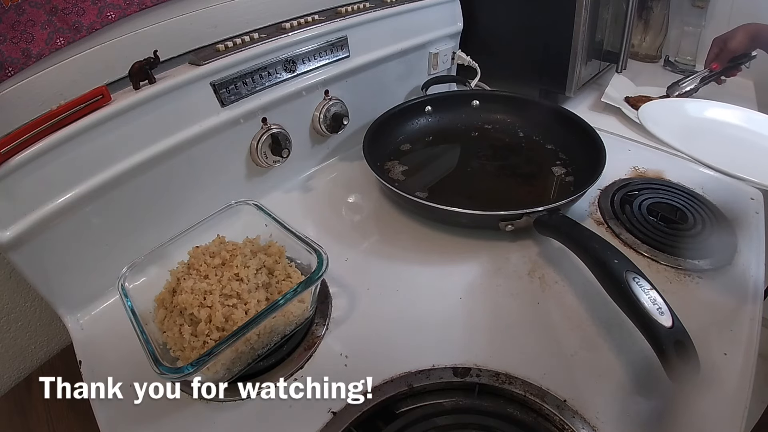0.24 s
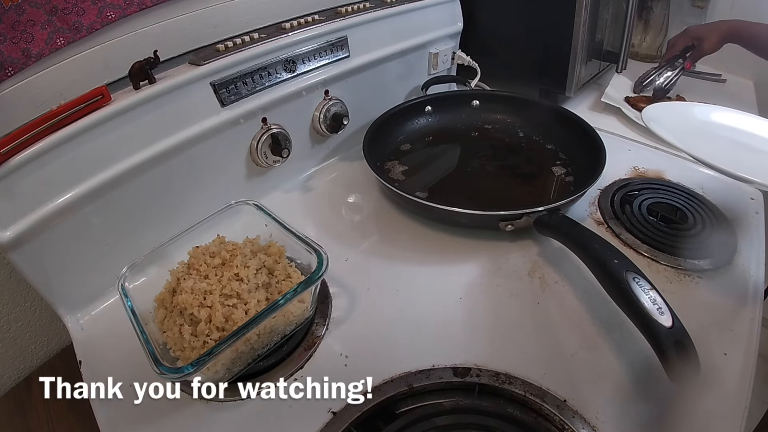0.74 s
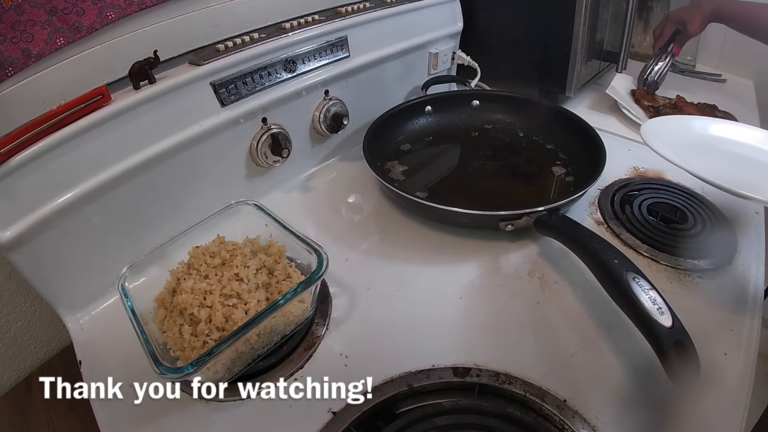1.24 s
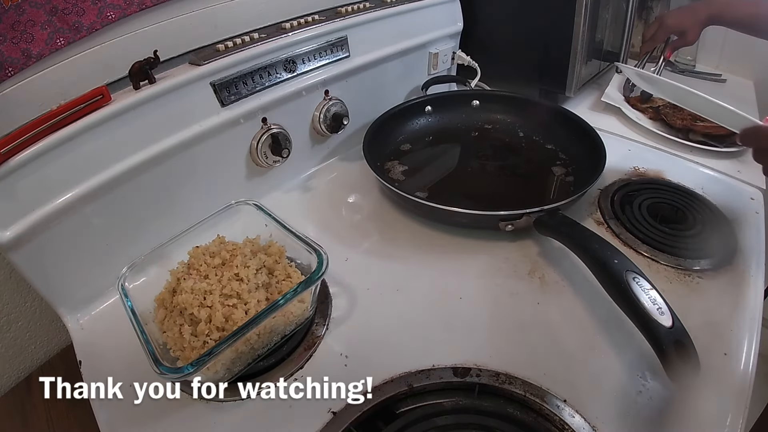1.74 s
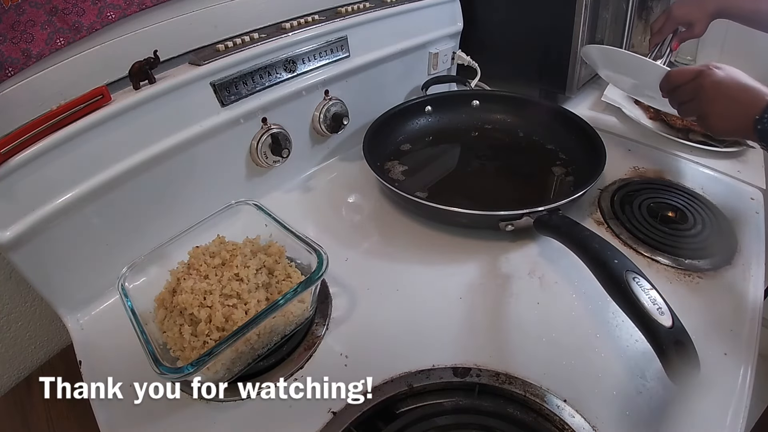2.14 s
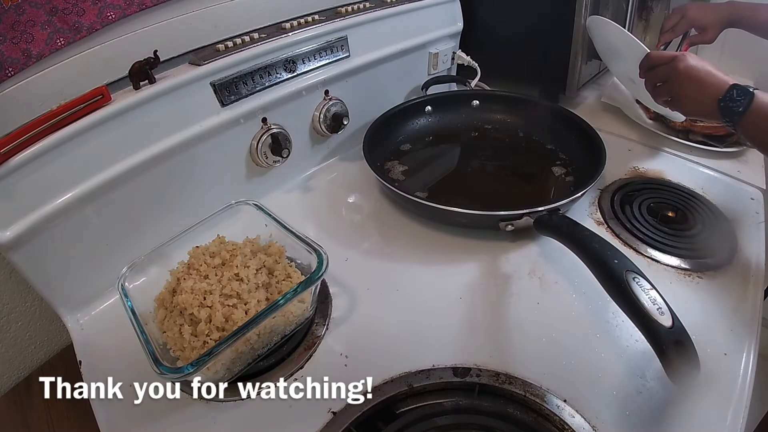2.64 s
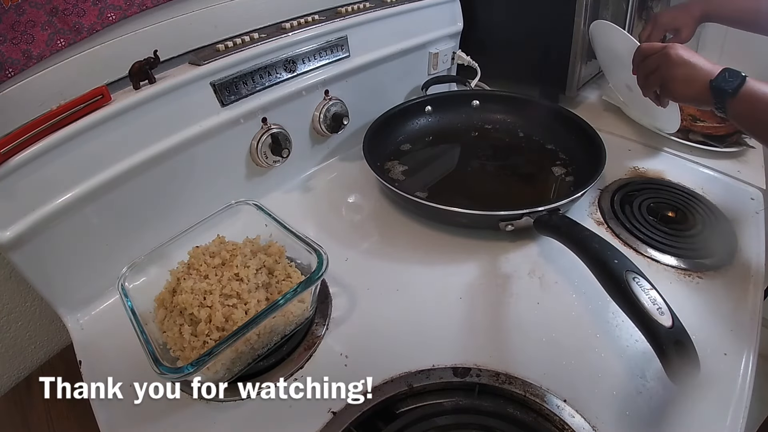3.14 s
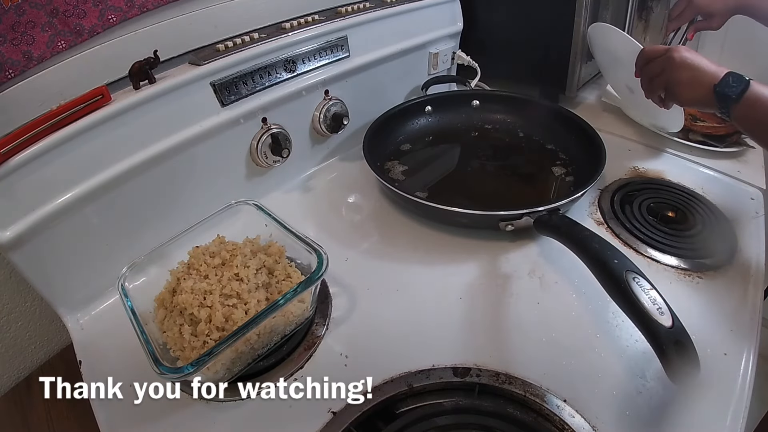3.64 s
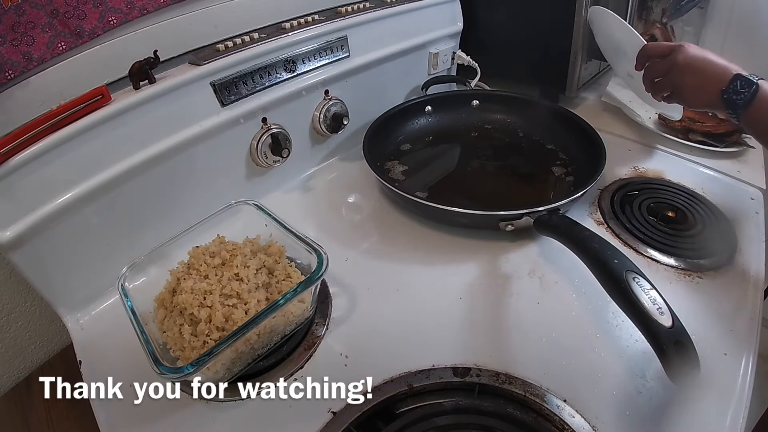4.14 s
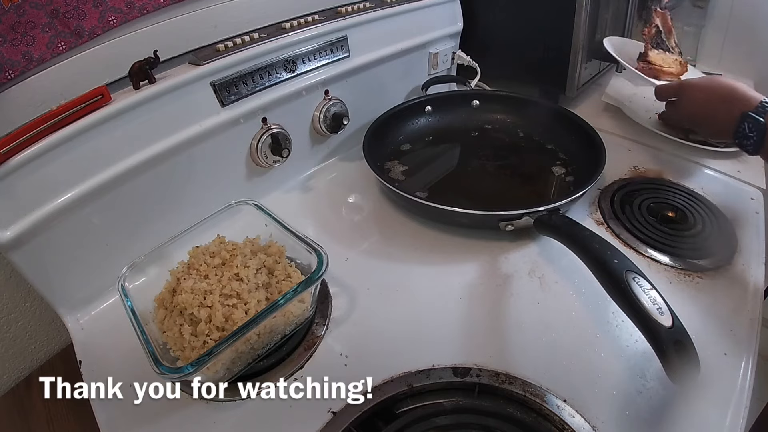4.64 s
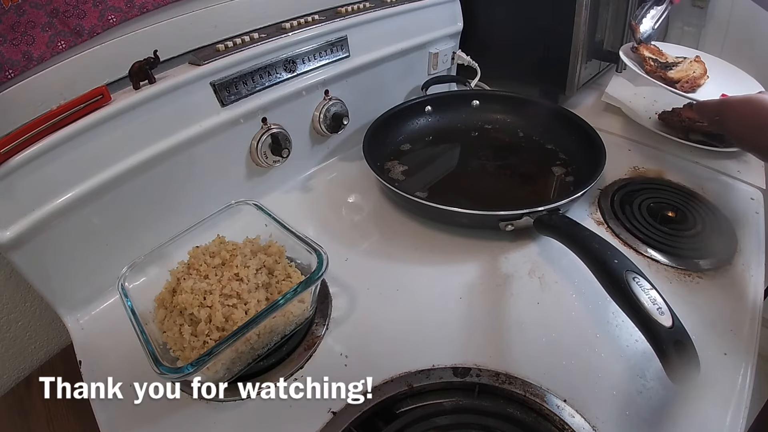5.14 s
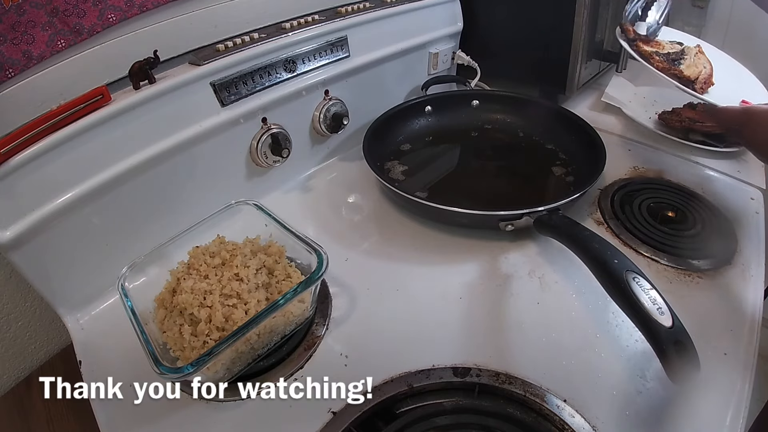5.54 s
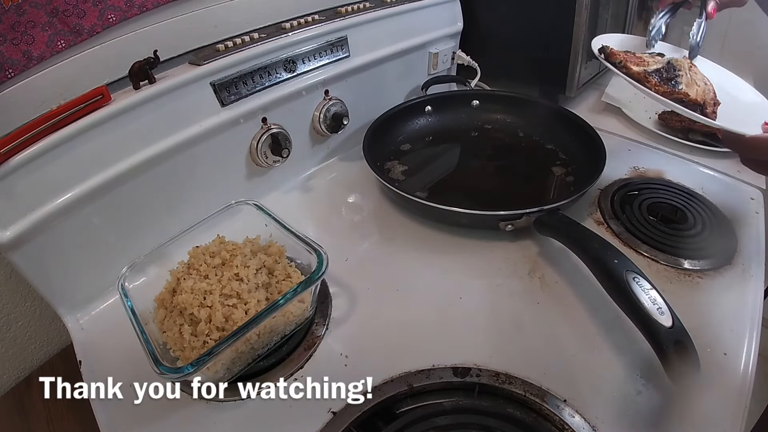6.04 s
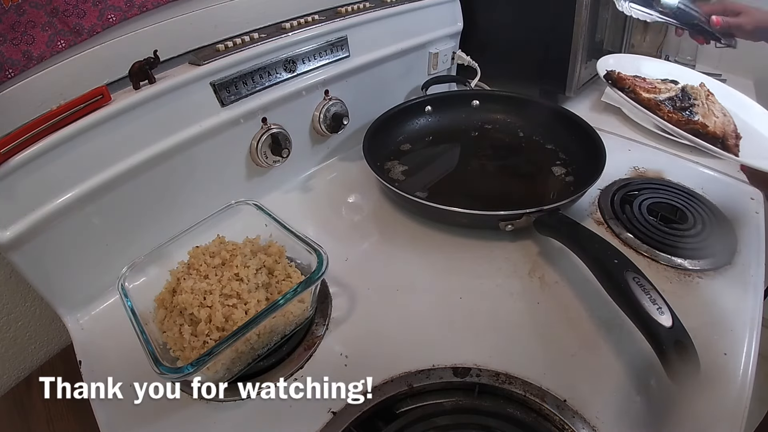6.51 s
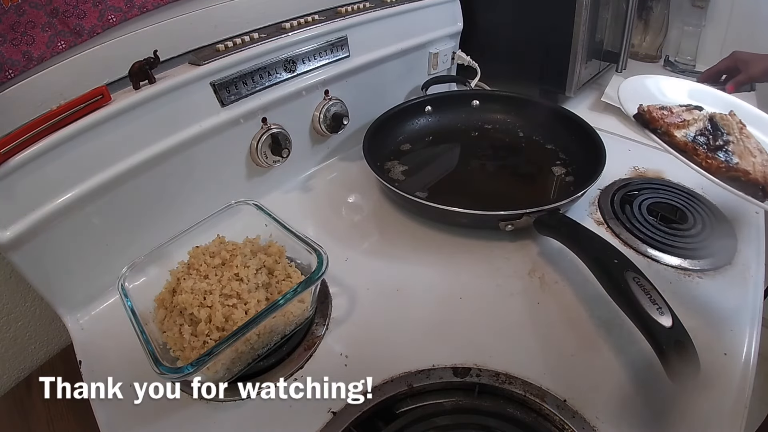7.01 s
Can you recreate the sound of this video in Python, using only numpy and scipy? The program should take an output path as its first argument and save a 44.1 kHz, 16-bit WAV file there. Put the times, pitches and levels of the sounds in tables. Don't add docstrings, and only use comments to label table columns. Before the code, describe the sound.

A small, hard-walled kitchen with a steady low fridge hum and faint whine, heard by a small microphone a metre away. Tongs tick faintly, crisp fish rustles on paper, and the counter thumps deeply once. Then a ceramic plate knocks sharply on a dish in hard, hand-damped clacks, followed by steel clinks, a flat landing, light hinge rattles, a distant sole squeak and a dull set-down.

```python
import sys
import numpy as np
from scipy import signal
from scipy.fft import rfft, irfft, next_fast_len
from scipy.io import wavfile
from scipy.ndimage import uniform_filter1d

SR = 44100
rng = np.random.default_rng(int(sys.argv[2]) if len(sys.argv) > 2 else 0)


def master_out(mix):
    frames = np.transpose(np.atleast_2d(mix))
    ceiling = np.clip(frames, -1, 1)
    pcm = np.round(ceiling * 32767).astype(np.int16)
    wavfile.write(sys.argv[1], SR, pcm)


def volts_from_decibels(level):
    exponent = np.asarray(level, float) / 20
    return 10 ** exponent


N = 320607
T = np.arange(N) / SR

# frequency in Hz, level in dB, t60 in seconds.
TONGS_MODES = [(3020, -14, .1), (3545, -3, .08), (4235, -9, .1), (4910, -8, .12), (5200, -5, .15),
               (5530, -9, .18), (6700, -5, .2), (6995, -3, .14), (7330, -6, .1), (7735, -2, .2),
               (8010, -8, .2), (8840, -4, .1), (9070, -3, .17), (9420, -4, .25), (9670, -8, .15),
               (9900, -5, .1), (10120, -8, .15), (10760, -12, .12), (11800, -18, .1), (13200, -24, .06)]


def shaped(x, gain):
    n = next_fast_len(len(x) + 4096)
    hz = np.arange(n // 2 + 1) * SR / n + 1
    return irfft(rfft(x, n) * gain(hz), n)[:len(x)]


def band(hz, octaves):
    return lambda f: np.exp(-.5 * (np.log2(f / hz) / octaves) ** 2)


def unit(x):
    return x / np.sqrt(np.mean(x ** 2))


def walk(rate):
    hold = int(SR / rate)
    steps = np.repeat(rng.standard_normal(N // hold + 1), hold)
    return unit(uniform_filter1d(uniform_filter1d(steps, hold), hold)[:N])


def decay(t, t60):
    return np.exp(-np.log(1000) * t / t60)


def add(track, s, sound):
    i = int(s * SR)
    track[i:i + len(sound)] += sound[:N - i]


def ring(hz, db, t60, rise=0.00031, seconds=.45, pair=1.0, split=0.009, loose=1):
    t = np.arange(int(seconds * SR)) / SR
    phase, twin_phase, gap = rng.uniform(0, 1, (3, 32, 1))[:, :len(hz)]
    build_up = 1 - np.exp(-t / np.c_[rise * np.ones(len(hz))])
    fade = decay(t, np.c_[t60]) * build_up
    cycles = np.c_[hz] * t
    first = np.sin(2 * np.pi * (cycles + loose * phase))
    twin = pair * np.sin(2 * np.pi * (cycles * (1 + split * (0.31 + gap)) + twin_phase))
    return volts_from_decibels(db) @ (fade * (first + twin))


def crack(gain, t60, rise):
    t = np.arange(min(int(1.2 * t60 * SR), 8192)) / SR
    burst = shaped(rng.standard_normal(8192), gain)[:len(t)]
    return unit(burst) * decay(t, t60) * (1 - np.exp(-t / rise))


def knocks():
    # frequency in Hz, level in dB, t60 in seconds.
    rim = [(691, -4.5, 0.19), (1168, -5, 0.33), (1890, -14.5, 0.47), (2318, -15.5, 0.17), (3020, -4, 0.2),
           (3370, -11, .3), (4016, -9.5, 0.32), (4172, -19, .4), (4830, -14, .5), (5360, 0, 0.26),
           (5980, -8.5, .4), (6600, -12, .4), (8592, -22, 0.13), (9211, -9, .15)]
    edge = [(705, -3.5, 0.11), (1150, 2, 0.37), (1820, -21.5, 0.42), (2073, -15.5, 0.46), (2356, -16, 0.1),
            (3070, -20, 0.089), (3410, -9, 0.27), (4020, -7, .4), (4861, -9.5, .4), (5300, -19, .2),
            (6616, -11, 0.17), (9265, -15, .3), (10300, -18, .3), (11750, -20, .2)]
    lip = [(1151, -6.5, 0.44), (1980, -18.5, 0.75), (2105, -14, 0.17), (2394, -17, 0.14),
           (3020, -11, 0.069), (3890, -13, 0.45), (4810, -24, 0.48), (5750, -17, 0.092), (6260, -11, 0.04),
           (8700, -22, 0.12), (719, -16.5, 0.66), (3960, -15, 0.4), (10300, -28, 0.16), (12000, -26, 0.12)]
    flat = [(681, 2, 0.45), (1044, 5, 0.31), (1187, 8.5, 0.4), (1219, 9, 0.2), (1453, 1.5, 0.28),
            (1676, -7, 0.3), (1843, -5, 0.34), (2045, -6, 0.39), (2340, -35, 0.67), (3250, -14, 0.15),
            (3400, -7.5, 0.2), (4670, -7, 0.22), (5300, -12, .2), (8530, -3, .1)]
    base = [(441, -2, 0.36), (704, -10.5, 0.27), (860, -12, .2), (1370, 3, 0.16), (1450, 3, .2),
            (2040, -22, .3), (2686, -10, 0.27), (3330, -7.5, 0.28), (7100, -20, .3)]
    # start in seconds, crack level in dB, crack centre in Hz,
    # ring level in dB over the crack, body level in dB over the crack.
    rim_knocks = [
        (2.634, -13, 4650, -8.5, -13.5),
        (2.6378, -14, 4660, -13.5, -18.5),
        (2.9014, -21, 3660, -15.5, -16),
    ]
    edge_knocks = [
        (3.0485, -36, 900, 1, 5.5),
        (3.0556, -10, 3900, -12.5, -17),
    ]
    lip_knocks = [
        (3.5797, -10, 4200, -11.5, -21),
        (3.604, -25.5, 2500, -12, -8.5),
    ]
    flat_knocks = [
        (4.323, -22, 2820, -16, -14),
        (4.334, -29, 2900, -10, -14),
    ]
    base_knocks = [
        (7.153, -34.5, 1490, -6.5, -6.5),
    ]
    # frequency in Hz, level in dB, t60 in seconds.
    clack = [(1640, -2.5, 0.072), (2335, -1, 0.031), (3012, 6, 0.02), (3995, -1, 0.088), (4755, -2, 0.021),
             (5274, 0, 0.019), (5880, 6, 0.0084), (6840, -9, .03), (8690, -5, 0.041), (9450, -8, 0.04),
             (10500, -19, 0.019), (11620, -0.5, 0.017)]
    spots = ((rim, rim_knocks), (edge, edge_knocks), (lip, lip_knocks), (flat, flat_knocks), (base, base_knocks))

    clatter, rings = np.zeros((2, N))
    chatter_db = 1.5 * walk(218.8)
    clack_hz, clack_db, clack_t60 = np.transpose(clack)
    for modes, hits in spots:
        hz, db, t60 = np.transpose(modes)
        longest_s = .3 * np.sqrt(1200 / np.maximum(hz, 1200))
        held_t60 = np.clip(.45 * t60, .015, longest_s)
        for s, peak_db, crack_hz, ring_db, body_db in hits:
            add(clatter, s, volts_from_decibels(peak_db - 11) * crack(band(crack_hz, 0.99), 0.028, 0.0012))
            add(clatter, s, volts_from_decibels(peak_db - 21) * crack(band(12500, 0.47), 0.0074, .0002))
            settle = crack(band(crack_hz, 1.14), 0.37, 0.0085)[:N - int(s * SR)]
            uneven_db = chatter_db[int(s * SR):][:len(settle)]
            add(clatter, s, volts_from_decibels(peak_db - 28 + uneven_db) * settle)
            lean_db = -4.3 * (np.log2(clack_hz / crack_hz) / 1.01) ** 2
            add(rings, s, ring(clack_hz, clack_db + lean_db + peak_db - 11.5, np.minimum(clack_t60, .04),
                               rise=0.00065, seconds=.06, split=0.033))
            add(rings, s, ring(hz, db + peak_db + ring_db, held_t60,
                               rise=0.0028, seconds=0.3, pair=0.55, split=.014))
            add(clatter, s, volts_from_decibels(peak_db + body_db) * crack(band(560, 1.0), 0.062, 0.0034))
    return clatter, rings


def light_contacts(modes, hits, ring_db, crack_db, crack_t60, rise, low_cut_db, dip_db, pair=0.24, longest_s=.11):
    out = np.zeros(N)
    hz, db, t60 = np.transpose(modes)
    tilt_hz = np.log([1500, 3000, 5300, 9000, 15000])
    for s, peak_db, bright_db, best_hz in hits:
        mid_db = dip_db + 1.5 * band(5300, .3)(best_hz)
        tilt_db = [low_cut_db - bright_db, -bright_db, mid_db, bright_db, bright_db - 9]
        tilt = lambda f: np.interp(np.log(f), tilt_hz, tilt_db)
        add(out, s, volts_from_decibels(peak_db + crack_db) * crack(lambda f: volts_from_decibels(tilt(f)), crack_t60, rise))
        scatter_db = 3 * rng.standard_normal(32)[:len(hz)]
        favour_db = 6.2 * band(best_hz, .02)(hz)
        mode_db = db + tilt(hz) + scatter_db + favour_db + peak_db + ring_db
        add(out, s, ring(hz, mode_db, np.clip(t60, .03, longest_s), rise, seconds=.22, pair=pair))
    return out


def plate_taps():
    # frequency in Hz, level in dB, t60 in seconds.
    ting_modes = [(1185, -18, 0.037), (2068, -4, 0.1), (3440, -13, .12), (3970, -19, 0.067),
                  (4710, -30, 0.1), (5173, -10, 0.078)]
    clink_modes = [(1128, -17.5, 0.2), (2070, -10.5, 0.24), (2976, -7, 0.029), (4020, -8.5, 0.17),
                   (4740, -5.5, 0.074), (5380, -4.5, 0.044), (5860, -8, 0.027), (7250, -24, .1),
                   (8420, -3, 0.047), (8550, -22, 0.051), (9400, -14, 0.033), (11500, -19, .04)]
    # start in seconds, peak in dB, brightness in dB, favoured mode in Hz.
    ting_hits = [
        (4.772, -41.5, -8.5, 2070),
        (4.838, -52, 7, 5860),
    ]
    clink_hits = [
        (2.992, -35.5, -1, 2070),
        (3.003, -28, 4, 5860),
        (3.9334, -55, 8, 8420),
        (3.9578, -34, 1.2, 4740),
        (3.9779, -43.5, -4.5, 4670),
        (4.0069, -43.5, 0.5, 4020),
        (4.0357, -40.5, 0.5, 4530),
        (4.0538, -61, 4, 3900),
        (4.6075, -47.5, -1, 4110),
    ]
    tings = light_contacts(ting_modes, ting_hits, ring_db=-6.5, crack_db=-6, crack_t60=0.057, rise=0.0016,
                           low_cut_db=-4.5, dip_db=8.5, pair=0.43, longest_s=0.26)
    clinks = light_contacts(clink_modes, clink_hits, ring_db=-5.5, crack_db=-9, crack_t60=0.09, rise=0.00033,
                            low_cut_db=4.5, dip_db=-1, pair=1.0, longest_s=0.12)
    return tings + clinks


def tongs():
    # start in seconds, peak in dB, brightness in dB, favoured mode in Hz.
    tick_hits = [(0.0623, -51.5, -5, 4280), (0.7428, -54, 0, 5200), (0.7993, -55, -13, 3400),
                 (0.9991, -55, 0, 5200), (1.3409, -49.5, -3, 7740), (1.5452, -50.5, 1, 7330),
                 (2.145, -49, -5, 7735), (4.2115, -49.5, 1, 7950), (4.4852, -55.5, 3, 5210),
                 (4.6875, -53.5, -0.5, 7540), (4.929, -46, -3.5, 3360), (5.3248, -50, 1, 7730),
                 (5.4051, -51.5, -1.5, 3540), (5.593, -51.5, 0, 9020), (7.0638, -48.5, -0.5, 7800)]
    rattle_hits = [(0.4015, -71.5, 3, 9400), (0.607, -69, 5.5, 7940), (0.6938, -73, 9, 9650),
                   (0.94, -65.5, 10, 9050), (1.0765, -64, 4, 9900), (1.2474, -72, 11, 5240),
                   (1.2815, -60, 4, 8830), (1.2874, -57, 6.5, 8840), (1.65, -51.5, 9, 9470),
                   (1.697, -62.5, 15, 8000), (1.757, -67, 16, 9420), (2.823, -53, -1, 5060),
                   (3.241, -64, 11, 9900), (3.414, -56.5, 3, 9450), (3.8105, -44, 0.5, 6995),
                   (3.82, -47.5, -0.5, 10000), (4.0864, -48, 11, 8700), (4.0951, -56, 4, 8840),
                   (5.216, -71.5, 15, 8900), (5.474, -63.5, 3, 5530), (6.108, -64, 6, 8900),
                   (6.1142, -50, 5, 8840), (6.1334, -54, 0, 4910), (6.1435, -47.5, 2, 6995),
                   (7.249, -53.5, 8, 8510)]
    snap_hits = [
        (6.334, -47, -2, 3548),
    ]
    # frequency in Hz, level in dB, t60 in seconds.
    open_modes = [(3548, -2.5, 0.07), (4231, -5, 0.091), (5529, -13, 0.16), (6600, -7, .16),
                  (7270, -8, .09), (7800, -10, .12), (9426, -8.5, 0.32), (9800, -9, .1)]
    low_cut_db = -14
    ticks = light_contacts(TONGS_MODES, tick_hits, ring_db=-9.5, crack_db=-4, crack_t60=0.1, rise=0.00086,
                           low_cut_db=low_cut_db, dip_db=-0.2, longest_s=0.098)
    rattles = light_contacts(TONGS_MODES, rattle_hits, ring_db=-10.5, crack_db=10.5, crack_t60=0.028,
                             rise=0.0006, low_cut_db=low_cut_db, dip_db=0)
    snaps = light_contacts(open_modes, snap_hits, ring_db=-4, crack_db=2.5, crack_t60=0.044, rise=0.00099,
                           low_cut_db=low_cut_db, dip_db=-1.5, pair=0.14, longest_s=0.4)
    return ticks + rattles + snaps


def scuffs():
    # start in seconds, peak in dB, brightness in dB, favoured mode in Hz.
    fish_hits = [
        (0.8414, -64, -10, 5980),
        (1.3803, -59, -11, 4360),
        (1.857, -55, 2.5, 9070),
        (1.871, -59, 4, 9070),
        (3.8979, -50, -0.5, 4830),
        (5.9093, -52.5, -9.5, 3450),
    ]
    touch_hits = [
        (2.625, -55, -5, 3020),
        (2.973, -50, 1.5, 9420),
        (3.05, -43, -2.5, 3020),
        (7.154, -45, -.3, 7735),
    ]
    return light_contacts(TONGS_MODES, fish_hits + touch_hits, ring_db=-19, crack_db=6, crack_t60=0.087,
                          rise=0.0015, low_cut_db=4.5, dip_db=0)


def rustle():
    # firmest moment in seconds, swell in seconds, ease in seconds.
    rubs = [
        (.906, .19, .25),
        (1.37, .15, .13),
        (1.78, .16, .2),
        (3.494, .13, .08),
        (3.96, .13, .3),
        (5.3, .14, .3),
        (7.27, .13, .1),
    ]
    # level in dB, crispness in dB.
    rub_force = [(-62.5, -13), (-70, -16), (-80, 6), (-57, -5), (-54, -17), (-83, 8), (-57, -6)]
    grain_gain = volts_from_decibels(1.93 * rng.exponential(size=N)) * volts_from_decibels(2.5 * walk(45))
    grains = rng.standard_normal(N) * grain_gain
    high = unit(shaped(grains, band(9200, 0.16)))
    mid = unit(shaped(grains, band(4040, 1.0)))
    out = np.zeros(N)
    for (s, swell_s, ease_s), (db, crisp_db) in zip(rubs, rub_force):
        gate = np.clip(np.minimum(T - s + swell_s, s + ease_s - T) / 0.02, 0, 1)
        slack = np.clip(np.maximum((s - T) / swell_s, (T - s) / ease_s), 0, 1)
        pressure = volts_from_decibels(db - 20.5 * slack)
        out += gate * pressure * (mid + volts_from_decibels(crisp_db) * high)
    return out


def thumps():
    # frequency in Hz, t60 in seconds, build-up in seconds.
    low_modes = [(88.3, 0.36, 0.0045), (137, 0.24, 0.024), (157, 0.25, 0.025), (195.8, 0.43, 0.0048),
                 (225.9, 0.14, 0.0034), (280.4, 0.42, 0.002), (309.2, 0.45, 0.0017), (328, 0.29, 0.0023),
                 (352, 0.4, 0.0019)]
    # start in seconds, peak in dB, lowest mode over the next in dB,
    # counter top level in dB, dish level in dB.
    blows = [
        (0.921, -32, -22, -11, -30),
        (0.969, -39.5, 0, -3, -14.5),
        (1.385, -19, 34, -6.5, -35),
        (1.491, -66, 25, -10, -13),
        (2.638, -15, -26, -12, -17),
        (2.909, -36.5, -19, 3.5, -7.5),
        (3.053, -9, 15, -6.5, -17),
        (3.584, -21.5, -38, -7.5, -18.5),
        (4.326, -35, 0.5, -0.5, -9),
        (7.159, -29.5, 25, 4.5, -8.5),
    ]
    # frequency in Hz, level in dB, t60 in seconds.
    lifted_dish = [(212.6, -38, 2.2), (286.5, -48, 2.9), (392, -39, 0.51)]
    out = np.zeros(N)
    add(out, 4.33, ring(*np.transpose(lifted_dish), rise=0.011, seconds=0.77, pair=0.28))
    hz, t60, rise = np.transpose(low_modes)
    for s, peak_db, sway_db, top_db, dish_db in blows:
        low_db, next_db = min(sway_db, 0), min(-sway_db, 0)
        db = np.interp(hz, [94.4, 139.3, 158.7, 202, 227.5, 294.5],
                       [low_db - 25.5, low_db, next_db, top_db - 12.5, top_db, dish_db - 6.5])
        add(out, s, ring(hz, db + peak_db + 6, t60, rise, seconds=0.96, pair=0.18, split=0.039, loose=0))
    return out


def squeak():
    # time in seconds, pitch in Hz, level in dB.
    glide = [
        (6.6, 1020, -69),
        (6.654, 988, -58.5),
        (6.734, 973, -59),
        (6.77, 1080, -67),
    ]
    s, hz, db = np.transpose(glide)
    gate = np.clip(np.minimum(T - s[0], s[-1] - T) / .02, 0, 1)
    pitch = np.interp(T, s, hz) * (1 + .004 * walk(40))
    phase = 2 * np.pi * np.cumsum(pitch) / SR
    return np.sqrt(2) * gate * volts_from_decibels(np.interp(T, s, db)) * np.sin(phase)


def fridge():
    # time in seconds, hum level in dB, traffic rumble level in dB.
    drift = [(0.0, -44, -70), (1.09, -47.5, -62), (2.271, -48, -73.5), (2.75, -46, -65), (5.93, -48.5, -71),
             (6.64, -49, -79), (7.27, -45.5, -69)]
    # frequency in Hz, width in Hz, level in dB.
    hum_peaks = [(157, 3.3, -24), (158.06, 13.9, -0.5), (187, 13.7, -8.5), (207.1, 8.7, -6.5),
                 (238.4, 27.5, -10.5), (289.3, 22, -14.5), (323.7, 58, -19.5), (479.3, 27.5, -23)]
    # frequency in Hz, level in dB.
    motor = [(59.2, -74.5), (79.2, -75), (1061, -101), (1120, -66.5), (1179, -69), (1238, -101.5),
             (1297, -73), (1357, -85), (1416, -83)]
    # frequency in Hz, density in dB per Hz.
    air_spectrum = [(90, -35), (250, 0), (600, -3.5), (900, -4), (1150, -8), (1400, -8.5), (1600, -14),
                    (3000, -18), (6100, -20.5), (6700, -28), (10000, -31), (12600, -30.5), (13200, -56)]
    # time in seconds, level in dB.
    air_swell = [(0, -5.5), (.7, -5), (.9, -2.5), (2.5, -1.5), (7.27, 0.2)]

    def resonances(f):
        powers = (volts_from_decibels(db) ** 2 / (1 + (2 * (f - hz) / width) ** 2) ** 2.3 for hz, width, db in hum_peaks)
        return np.sqrt(sum(powers))

    s, hum_db, traffic_db = np.transpose(drift)
    hum = unit(shaped(rng.standard_normal(N), resonances)) * volts_from_decibels(np.interp(T, s, hum_db))
    traffic = unit(shaped(rng.standard_normal(N), band(56.7, 0.48))) * volts_from_decibels(np.interp(T, s, traffic_db) + 6)
    whine = np.zeros(N)
    for hz, db in motor:
        level = np.sqrt(2) * volts_from_decibels(db + 1.8 * walk(2.05))
        whine += level * np.sin(2 * np.pi * (hz * T + 0.025 * walk(6.6)))
    hz, db = np.transpose(air_spectrum)
    air = shaped(rng.standard_normal(N), lambda f: volts_from_decibels(np.interp(np.log(f), np.log(hz), db, left=-60)))
    air = unit(air) * volts_from_decibels(-58.5 + 0.09 * walk(0.1))
    swell = volts_from_decibels(np.interp(T, *np.transpose(air_swell)))
    return hum + traffic + (whine + air) * swell


def kitchen(x):
    # centre in Hz, t60 in seconds, level in dB.
    tail_bands = [(150, .35, -20), (518, 0.54, 10), (1200, 0.51, 2), (2570, 0.46, 3.5), (5740, 0.64, -3.5),
                  (10000, 0.26, -3.5), (14000, 0.35, -6)]
    t = np.arange(int(.6 * SR)) / SR
    tail = np.zeros(len(t))
    for hz, t60, db in tail_bands:
        noise = shaped(rng.standard_normal(len(t)), band(hz, 0.96))
        tail += volts_from_decibels(db) * unit(noise * decay(t, t60)) * np.sqrt(hz / SR / len(t))
    first_wall = np.clip((t - .002) / 0.00064, 0, 1)
    return x + signal.fftconvolve(x, tail * first_wall)[:N]


def scene():
    clatter, rings = knocks()
    ring_send = .45
    handling = plate_taps() + tongs() + scuffs() + rustle()
    room = kitchen(clatter + ring_send * rings + handling) + (1 - ring_send) * rings
    return (room + thumps() + squeak() + fridge())[None]


def top_cut(x):
    return signal.sosfilt(signal.butter(12, 16470, fs=SR, output="sos"), x)


def record(dry):
    # frequency in Hz, gain in dB.
    capsule = [(60, -6), (125, -1), (10200, -0.5), (11200, -12), (14500, -11.5), (16500, -36)]
    hz, db = np.transpose(capsule)
    heard = shaped(dry[0], lambda f: volts_from_decibels(np.interp(np.log(f), np.log(hz), db)))
    return top_cut(heard[None])


dry = scene()
out = record(dry)
master_out(out)
```